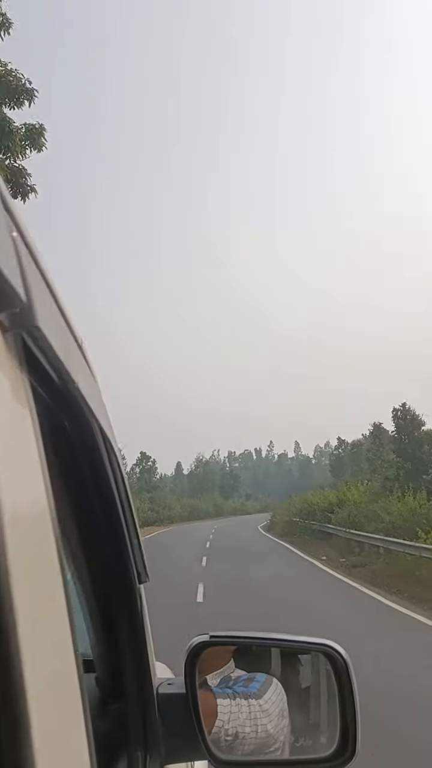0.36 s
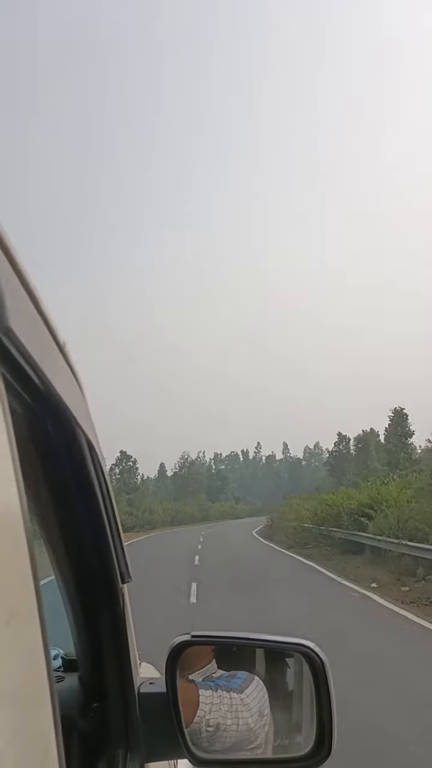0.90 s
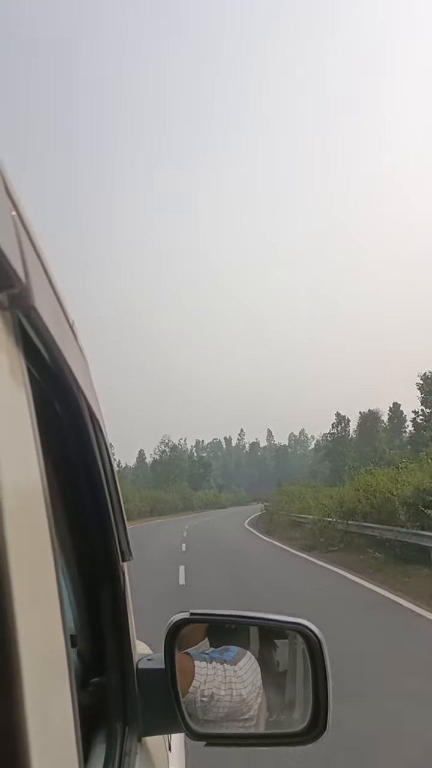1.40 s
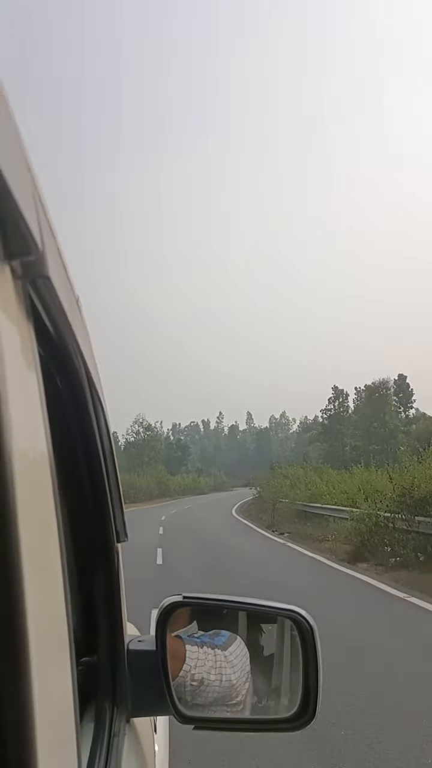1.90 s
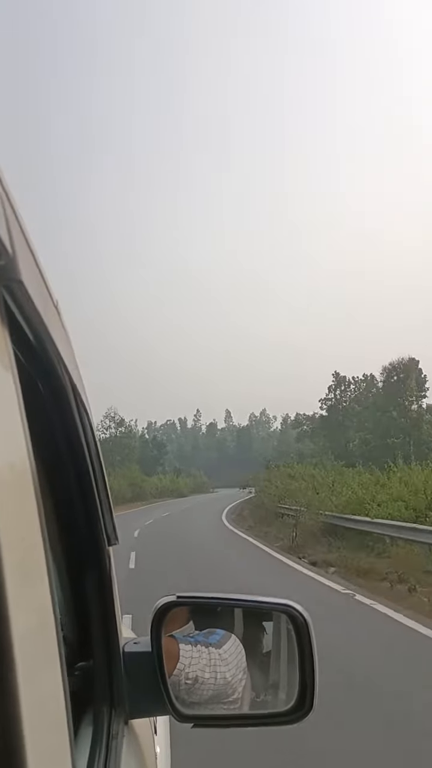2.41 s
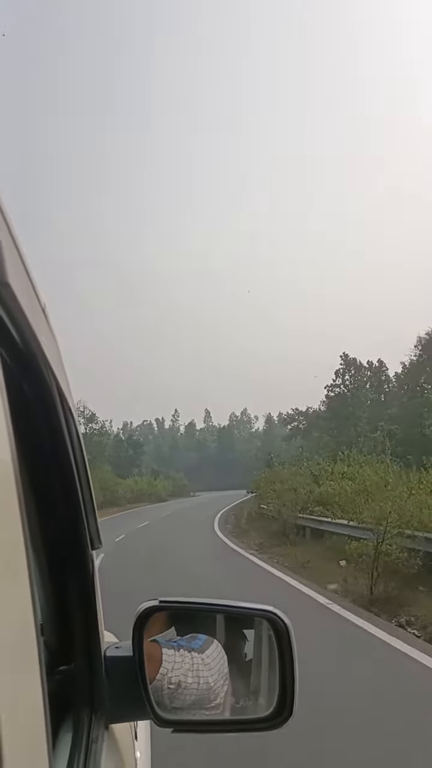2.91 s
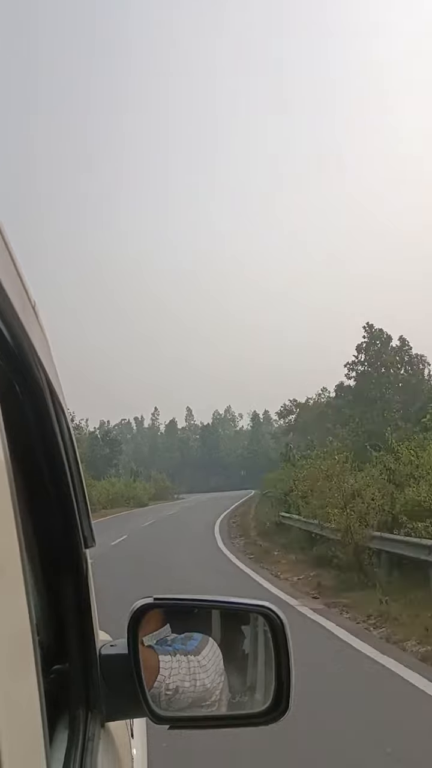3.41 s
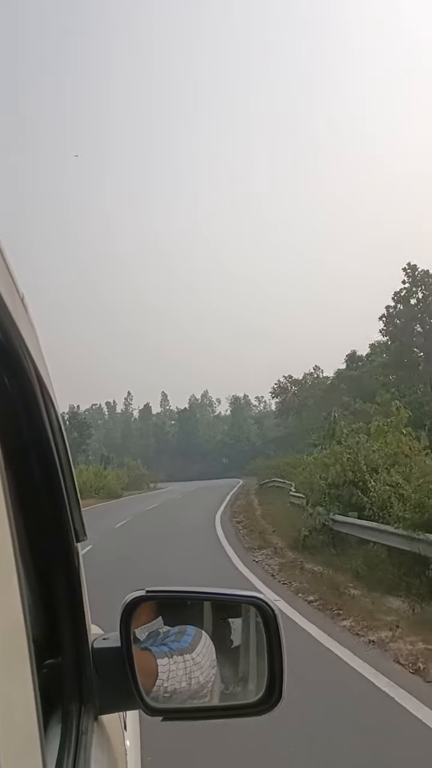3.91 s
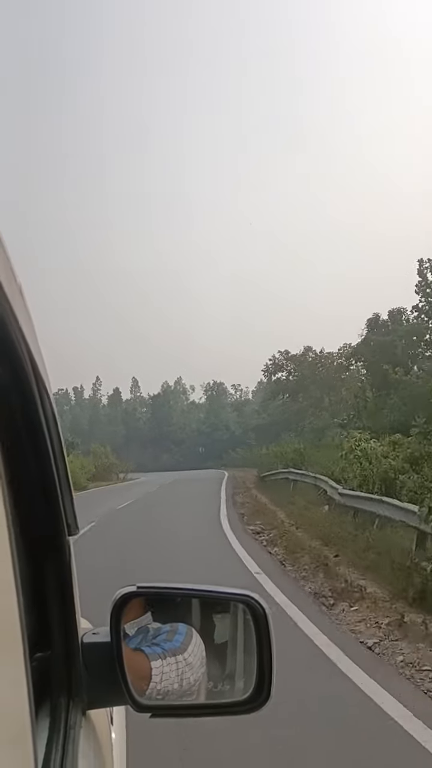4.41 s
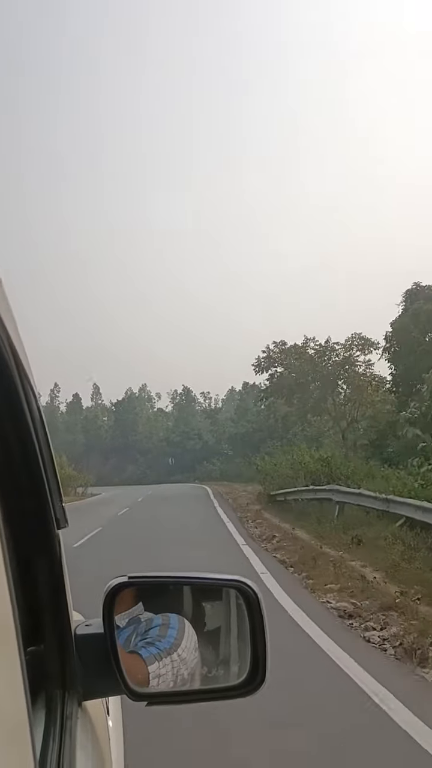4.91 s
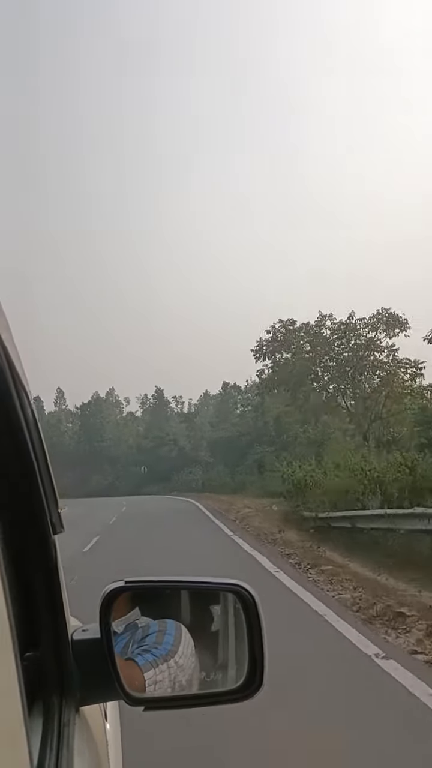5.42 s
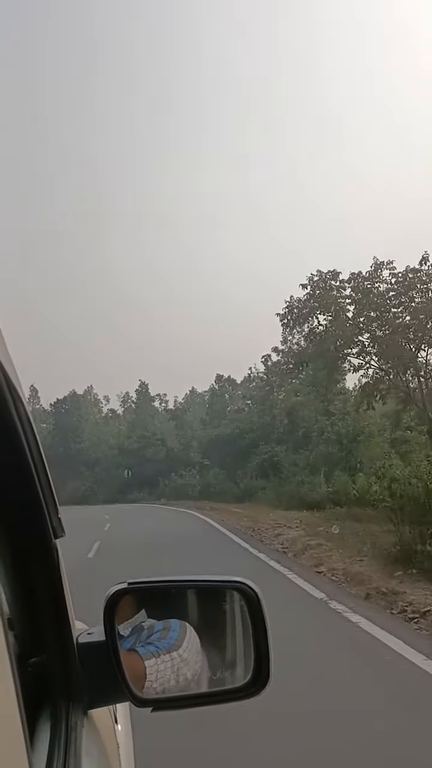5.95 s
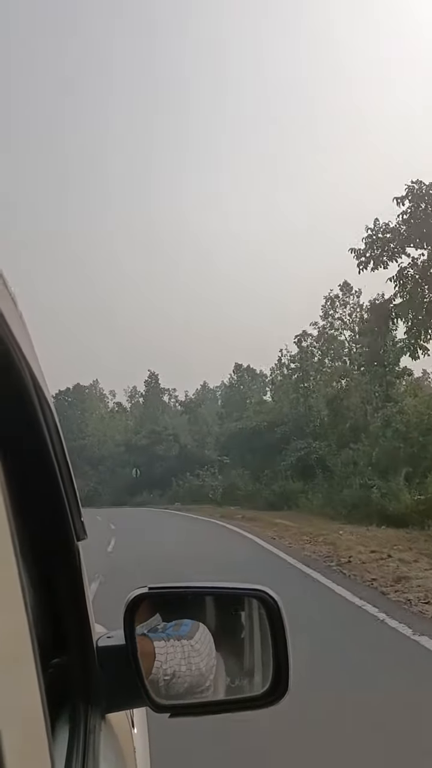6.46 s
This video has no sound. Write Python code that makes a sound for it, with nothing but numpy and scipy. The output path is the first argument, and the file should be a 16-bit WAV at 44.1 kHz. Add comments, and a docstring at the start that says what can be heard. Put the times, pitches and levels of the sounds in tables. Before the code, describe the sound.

Strong wind buffets a microphone at a moving car's open window, rumbling and fluttering with sharp crackles over a steady rush of tyres and air.

```python
"""Wind buffets a handheld recorder held out of the window of a moving car, separately at its two ports.
Big eddies rumble as slow noise; faster flow lifts the corner of a falling noise spectrum, so flutter brightens.
Crackles are short puffs of noise, loud ones listed and small ones around every gust; a few flaps swing at both ports.
Underneath lie smooth noise of tyres and slipstream, with the recorder's own steadier hiss above 7 kHz,
and thin sliding hisses at the left port. A fast limiter rounds the peaks."""
import sys
import numpy as np
from scipy import signal
from scipy.fft import rfft, irfft
from scipy.io import wavfile
from scipy.ndimage import uniform_filter1d, minimum_filter1d

SR = 44100
rng = np.random.default_rng(int(sys.argv[2]) if len(sys.argv) > 2 else 0)


def pcm_store(signal):
    """Save signal as 16-bit PCM."""
    levels = np.round(np.clip(np.atleast_2d(signal), -1, 1) * 32767)
    wavfile.write(sys.argv[1], SR, levels.astype(np.int16).T)


def gain_from_db(level_db):
    """Turn a decibel level (scalar or array-like) into a linear amplitude factor."""
    decades = np.asarray(level_db, float) / 20
    return 10 ** decades


N = 289737

# colour each port gives the wind: (frequency [Hz], gain [dB])
PORT_LEFT = [(2000, -3.5), (6000, -2.5), (7500, -25), (10000, -18), (15000, -10)]
PORT_RIGHT = [(2000, 1), (6500, -8), (8200, -9), (11000, -12.5), (13000, -19), (15500, -27)]
PORTS = PORT_LEFT, PORT_RIGHT
# gusts sweeping past one port: (time [s], port [0 left, 1 right], added flow speed [octaves], length [ms])
GUSTS = [(0.102, 1, 0.6, 19), (0.167, 1, 0.91, 130), (0.22, 0, 1, 33), (0.259, 1, 1.34, 41),
         (0.367, 0, 1.27, 13), (0.4, 1, 1.6, 14), (0.483, 1, 1.36, 90), (0.499, 0, 1.3, 85),
         (0.572, 0, 0.31, 32), (0.599, 1, 0.86, 250), (0.706, 0, 1.44, 70), (0.831, 1, 1.2, 10),
         (0.926, 0, 0.51, 58), (1.002, 1, 0.74, 110), (1.07, 0, 1.2, 26), (1.047, 1, 0.67, 18),
         (1.098, 1, 0.28, 250), (1.211, 0, 1.46, 38), (1.27, 1, 1.3, 50), (1.295, 0, 1.2, 17),
         (1.405, 1, 1, 61), (1.462, 0, 1.44, 37), (1.492, 1, 1.1, 28), (1.55, 1, 1.85, 16),
         (1.624, 1, 0.96, 38), (1.694, 0, 0.3, 51), (1.7, 1, 1.54, 68), (1.743, 0, 1.1, 22),
         (1.782, 1, 1.43, 35), (1.838, 0, 1.2, 15), (1.848, 1, 1.23, 45), (1.885, 0, 0.67, 39),
         (1.909, 1, 1.02, 26), (2.029, 0, 0.9, 19), (2.104, 1, 0.85, 96), (2.155, 1, 1.05, 25),
         (2.177, 0, 1.1, 80), (2.231, 1, 0.9, 30), (2.361, 1, 1.45, 31), (2.473, 1, 0.91, 63),
         (2.525, 0, 0.88, 59), (2.6, 1, 1.66, 24), (2.667, 0, 1.4, 19), (2.68, 1, 1.33, 63),
         (2.712, 0, 1.8, 23), (2.815, 1, 1.35, 35), (2.87, 0, 0.94, 32), (2.919, 1, 1.97, 25),
         (2.98, 1, 1.25, 30), (3.052, 0, 1.1, 36), (3.13, 0, 1.14, 18), (3.293, 1, 1.27, 72),
         (3.372, 0, 0.48, 47), (3.503, 1, 1.6, 29), (3.618, 1, 1.06, 41), (3.636, 0, 1.6, 22),
         (3.68, 1, 0.95, 16), (3.717, 0, 1.3, 21), (3.738, 1, 1, 140), (3.776, 0, 0.83, 52),
         (3.823, 0, 0.93, 11), (3.94, 1, 0.86, 27), (3.972, 0, 1.5, 28), (4.013, 1, 1.9, 22),
         (4.063, 0, 1.35, 62), (4.151, 0, 0.7, 23), (4.169, 1, 1.74, 18), (4.193, 0, 0.66, 21),
         (4.199, 1, 0.69, 29), (4.329, 1, 1.35, 26), (4.383, 1, 1.46, 61), (4.36, 0, 0.8, 37),
         (4.4, 0, 0.68, 24), (4.469, 1, 1.5, 19), (4.523, 1, 1.14, 32), (4.627, 0, 1.7, 32),
         (4.652, 0, 1.5, 33), (4.648, 1, 1.1, 25), (4.68, 1, 0.94, 43), (4.69, 0, 1.3, 26),
         (4.729, 1, 1.4, 14), (4.778, 0, 1.13, 44), (4.794, 1, 0.83, 23), (4.887, 1, 1.7, 91),
         (4.931, 0, 0.7, 63), (4.967, 1, 0.87, 23), (5.039, 0, 1.3, 60), (5.114, 1, 0.96, 47),
         (5.132, 0, 1.6, 21), (5.141, 1, 1.02, 17), (5.21, 0, 1.3, 54), (5.218, 1, 1.16, 80),
         (5.299, 1, 0.97, 23), (5.316, 0, 0.68, 21), (5.361, 1, 0.92, 24), (5.442, 0, 1.04, 24),
         (5.455, 1, 1.4, 45), (5.535, 0, 0.6, 37), (5.556, 1, 0.95, 21), (5.684, 0, 1.04, 20),
         (5.722, 1, 0.77, 190), (5.772, 1, 0.5, 52), (5.786, 0, 1.07, 56), (5.841, 1, 1.04, 67),
         (5.931, 0, 0.94, 16), (5.999, 1, 1.15, 35), (6.032, 0, 1, 30), (6.151, 1, 0.84, 59),
         (6.334, 1, 0.79, 39), (6.394, 0, 0.43, 44), (6.415, 1, 1.26, 50), (6.473, 1, 0.81, 130)]
GUST_RISE_SHARE = 0.5  # part of a gust's length spent rising


def evened(x):
    """Scales a signal to rms 1."""
    return x / np.sqrt(np.mean(x ** 2) + 1e-20)


def read(points, hz):
    """Reads a (frequency, value) curve along a logarithmic frequency axis."""
    f, value = np.transpose(points)
    return np.interp(np.log(hz + 1), np.log(f + 1), value)


def wander(frames, smooth):
    """Slow chance of rms 1: noise smoothed by a bell about `smooth` frames wide."""
    steps = np.arange(-40, 41)
    bell = np.exp(-.5 * (steps / smooth) ** 2)
    return evened(np.convolve(rng.standard_normal(frames), bell, "same"))


def coloured(x, gain):
    """Fixed filter: gain(hz) as a factor."""
    return irfft(rfft(x) * gain(np.fft.rfftfreq(N, 1 / SR)), N)


def shaped(noise, gain_db, size):
    """Moving filter: weights the short-time spectrum of the noise by gain_db(hz, t)."""
    overlap = size * 3 // 4
    hz, t, z = signal.stft(noise, SR, nperseg=size, noverlap=overlap)
    z = z * gain_from_db(gain_db(hz[:, None], t))
    return signal.istft(z, SR, nperseg=size, noverlap=overlap)[1][:N]


def bumps(events, port, t, rise=0.46):
    """The tallest bell at each moment; an event's length is the width at half height."""
    here = [row for row in events if round(row[1]) == port]
    s, _, height, ms = np.transpose(here)[:, :, None]
    half_s = ms / 1000 * np.where(t < s, rise, 1 - rise)
    return (height * 2. ** -((t - s) / half_s) ** 2).max(axis=0)


def rush():
    """Tyres and slipstream, with the recorder's own steadier hiss above 7 kHz: patchy noise, partly shared."""
    # rush and hiss at each port: (frequency [Hz], level [dB])
    left_colour = [(600, 0), (1000, 3), (1600, -3.5), (2100, -2.5), (2600, -3.5), (3000, -7.5), (3500, -8),
                   (4800, -18.5), (6000, -13.5), (6800, -21), (7500, -39.5), (10500, -32.5), (12200, -36.5),
                   (14000, -31.5), (15500, -29)]
    right_colour = [(600, 0), (1000, 1), (1600, -11.5), (2400, -8), (3400, -15.5), (4800, -24),
                    (6800, -31.5), (8300, -28.5), (10500, -31.5), (13000, -38.5), (14200, -62),
                    (15500, -69)]
    # the rush swells with the roadside: (time [s], left [dB], right [dB])
    swell_points = [(0.0, -5, -4), (0.51, 1.5, -1), (0.77, 0, -2.5), (1.1, 4.5, 1.5), (1.57, 4, -4.5),
                    (2.05, 5, 0), (2.22, 2.5, -2), (2.5, 5, 4), (2.92, 5, 3), (3.21, 6, 6.5),
                    (3.61, 6.5, 4), (3.65, 0, -4), (3.95, 4, -0.5), (4.33, 2, 0.5), (4.57, 4, 0.5),
                    (5.22, -1.5, -3), (5.78, 1.3, -1.5), (6.57, 4, -1)]
    # part of the noise that both ports share: (frequency [Hz], likeness [0-1])
    shared_points = [(2000, 0.72), (6000, 0.03), (7500, 0.05)]
    level_db, patchy_db = -21, 0.9
    left_lead_s = 20 / SR  # the shared part reaches the left port first
    swell = np.transpose(swell_points)

    def likeness(hz):
        return np.clip(read(shared_points, hz), 0, 1)

    left, own = rng.standard_normal((2, N))
    late = coloured(left, lambda hz: likeness(hz) * np.exp(-2j * np.pi * hz * left_lead_s))
    right = late + coloured(own, lambda hz: np.sqrt(1 - likeness(hz) ** 2))

    def gain_db(hz, t, port):
        patches = uniform_filter1d(rng.standard_normal((len(hz), len(t))), size=12, axis=0)
        patches = evened(uniform_filter1d(patches, size=20, axis=1))
        follows = np.where(hz < 7200, 1, .55)  # the recorder's hiss is steadier
        moving = follows * np.interp(t, swell[0], swell[port + 1])
        moving = moving + 0.61 * wander(len(t), 3.5)
        moving = moving + (hz > 7200) * 1.0 * wander(len(t), 22)  # random level wander above 7.2 kHz, dB rms
        return level_db + read((left_colour, right_colour)[port], hz) + moving + patchy_db * patches

    return np.array([shaped(x, lambda hz, t: gain_db(hz, t, port), size=512)
                     for port, x in enumerate((left, right))])


def hisses():
    """Thin high hisses at the left port: narrow bands of noise that swell, slide or hold pitch, and fade."""
    # (start [s], length [s], from [Hz], to [Hz], level [dB])
    hiss_rows = [(0.672, 0.014, 14500, 14500, -44), (0.78, 0.29, 14300, 15650, -56),
                 (1.1, 0.14, 14600, 15500, -62)]
    least_width_hz = 700
    out = np.zeros((2, N))
    for s, length, from_hz, to_hz, db in hiss_rows:
        u = np.arange(round(length * SR)) / (length * SR)
        a, b = rng.standard_normal((2, len(u)))
        width_hz = least_width_hz * (1 + .03 / length)  # short ones spread wider
        r = np.exp(-np.pi * width_hz / SR)
        band = signal.lfilter([1], [1, -r], a + 1j * b)
        band = signal.lfilter([1], [1, -r], band)
        pitch_hz = from_hz + (to_hz - from_hz) * u
        band = (band * np.exp(2j * np.pi * np.cumsum(pitch_hz) / SR)).real
        out[0, round(s * SR):][:len(u)] += gain_from_db(db) * evened(band) * np.sqrt(np.sin(np.pi * u))
    return out


def flow(port, t):
    """Air at one port: rumble level in dB, flow speed in octaves, and the quick swells in dB."""
    # how hard the air blows on each port: (time [s], left rumble [dB], right rumble [dB])
    blow_points = [(0.0, -16.5, -22), (0.51, -16, -12.5), (1.01, -16, -13.5), (1.52, -15, -11),
                   (2.02, -18.5, -10.5), (2.53, -15, -16.5), (3.03, -17, -14), (3.54, -16, -14.5),
                   (4.04, -16.5, -13.5), (4.55, -14, -12.5), (5.05, -16, -16.5), (5.56, -17, -16.5),
                   (6.06, -15, -11.5), (6.57, -18, -17)]
    # lulls in the buffeting: (time [s], port [0 left, 1 right], rumble dip [dB], length [ms])
    lull_rows = [(0.045, 0, 10, 45), (0.167, 0, 12, 22), (0.202, 1, 9, 19), (0.282, 0, 10, 22),
                 (0.344, 1, 8, 56), (0.402, 0, 15, 33), (0.519, 1, 14, 67), (0.626, 0, 0, 92),
                 (0.771, 1, 7.5, 64), (0.778, 0, 7, 53), (0.868, 1, 11, 18), (0.878, 0, 19, 27),
                 (0.923, 1, 18, 14), (0.975, 0, 5, 40), (1.023, 0, 15, 14), (1.102, 0, 7, 24),
                 (1.227, 1, 8.5, 38), (1.275, 0, 7, 27), (1.571, 0, 6, 22), (2.08, 0, 4, 30),
                 (2.185, 1, 14.5, 19), (2.275, 0, 6, 41), (2.312, 1, 8, 65), (2.412, 1, 7, 33),
                 (3.066, 1, 5, 47), (3.15, 1, 9, 23), (3.345, 0, 6, 21), (3.437, 1, 14, 20),
                 (3.707, 1, 7, 33), (3.871, 0, 8, 41), (4.023, 0, 7, 40), (4.108, 1, 8.4, 28),
                 (4.245, 1, 11, 62), (4.482, 0, 3, 32), (4.545, 0, 8, 24), (4.81, 1, 5, 15),
                 (4.834, 0, 13, 89), (4.954, 0, 20, 22), (5.32, 1, 6, 25), (5.498, 0, 10, 14),
                 (5.575, 0, 13, 43), (5.877, 0, 1, 26), (5.919, 1, 7, 57), (6.001, 0, 12, 19),
                 (6.056, 1, 11, 37), (6.081, 0, 12, 13), (6.178, 0, 5, 25), (6.241, 1, 9, 25),
                 (6.37, 1, 6, 21)]
    # rounded thumps of a big eddy: (time [s], port [0 left, 1 right], lift [dB], length [ms])
    thump_rows = [(0.085, 1, 12, 35), (0.137, 1, 2.5, 33), (0.262, 1, 5.5, 48), (0.444, 0, 6, 35),
                  (0.895, 1, 4, 28), (1.063, 0, 2, 45), (1.312, 0, 5.5, 40), (1.841, 0, 9, 56),
                  (2.155, 0, 3, 34), (2.227, 1, -1.5, 45), (2.906, 1, 4.7, 27), (3.325, 1, 7, 32),
                  (3.417, 0, 9.5, 23), (4.086, 0, 5.5, 30), (4.298, 0, 4.5, 58), (4.502, 1, 7, 49),
                  (5.128, 0, -2, 12), (5.443, 0, 8, 30), (5.64, 1, 4.5, 17), (5.749, 0, 11.5, 63),
                  (5.802, 1, 5, 15), (6.034, 0, 4, 35)]
    calm_octaves = (1, 0.89)  # flow speed between gusts, left and right
    gust_lift_db, lull_slowing = 2.5, 0.014  # rumble dB per octave of gust; octaves lost per dB of lull
    blow = np.transpose(blow_points)
    gust = bumps(GUSTS, port, t, GUST_RISE_SHARE)
    lull = bumps(lull_rows, port, t)
    swell_db = bumps(thump_rows, port, t) - lull
    level_db = np.interp(t, blow[0], blow[port + 1]) + gust_lift_db * gust + swell_db
    speed = calm_octaves[port] + gust - lull_slowing * lull
    return level_db, speed, swell_db


def throb():
    """Slow random gain, 2.36 dB rms, shared by the rumble and flutter of one port."""
    frames = N // 256 + 2
    return gain_from_db(2.36 * np.interp(np.arange(N) / 256, np.arange(frames), wander(frames, 4.9)))


def rumble(port):
    """Big eddies: slow pressure lumps of fairly even height under the rumble level."""
    # spectrum of the big eddies: (frequency [Hz], gain [dB])
    spectrum = [(15, -1), (30, 5), (60, 6), (100, 1), (150, -3.5), (250, -12), (500, -52), (2500, -130)]
    steadiness = 0.39  # 0 leaves the lumps uneven, 1 evens them fully
    lumps = coloured(rng.standard_normal(N), lambda hz: gain_from_db(read(spectrum, hz)))
    power = uniform_filter1d(uniform_filter1d(lumps ** 2, size=1500), size=1500)
    height = np.sqrt(abs(power) + 1e-12)
    t = np.arange(0, N / SR, .004)
    level_db = np.interp(np.arange(N) / SR, t, flow(port, t)[0])
    return evened(lumps / height ** steadiness) * gain_from_db(level_db)


def flutter(port):
    """Frozen turbulence: the corner of its spectrum rises with the flow speed, which jitters and surges."""
    # left row, right row: (level [dB], fall above the corner [dB per octave], speed jitter [octaves], lowest [Hz])
    port_rows = [(5.5, 13.84, 0.3, 101), (6, 13.43, 0.32, 42)]
    slow_corner_hz = 96.7  # finest eddies at speed 0
    gust_flicker = 0.3  # octaves of flicker per octave of gust
    follows = 0.66  # share of each lull and thump that the smaller eddies feel
    level_db, fall_db, jitter, low_hz = port_rows[port]

    def gain_db(hz, t):
        rumble_db, speed, swell_db = flow(port, t)
        speed = speed + jitter * wander(len(t), 2.7)
        gust = bumps(GUSTS, port, t)
        speed += gust_flicker * gust * wander(len(t), 1.57)  # gusts arrive as ragged bursts
        speed += 0.073 * np.maximum(wander(len(t), 0.46), 0) ** 2  # sharp eddy edges flick by
        over_corner = hz / slow_corner_hz / 2 ** speed
        fall = fall_db / 2 * np.log2(1 + over_corner ** 2)
        fall += 5 * np.log2(1 + (over_corner / 9) ** 2)  # viscosity wipes out the finest eddies
        # part of each rumble swell also lifts the smaller eddies
        lift = 0.33 * (rumble_db + 13) + follows * swell_db / (1 + (hz / 600) ** 2)
        return level_db + lift - fall + read(PORTS[port], hz) + 1.85 * wander(len(t), 1.35)

    eddies = shaped(rng.standard_normal(N), gain_db, size=256)
    return coloured(eddies, lambda hz: 1 / (1 + (low_hz / (hz + 1)) ** 2))  # the largest belong to the rumble


def flaps():
    """Heavy flaps that strike both ports together: a few swings under a bell-shaped envelope."""
    # (time [s], frequency [Hz], peak [dB], length at half height [ms])
    flap_rows = [(4.648, 270, -2.5, 24), (6.018, 110, -7, 20)]
    t = np.arange(N) / SR
    out = np.zeros(N)
    for s, hz, db, ms in flap_rows:
        bell = 2. ** -((t - s) / ms * 2000) ** 2
        out += gain_from_db(db) * bell * np.cos(2 * np.pi * (hz * (t - s) + rng.random()))
    return out


def scattered(count):
    """Rows of small crackles, `count` at random around each gust's peak, louder in faster gusts."""
    small_db, db_per_octave, spread_db = -62, 14, 6
    treble_db, treble_spread_db = -29.5, 5
    rows = []
    for (s, port, up, ms), draws in zip(GUSTS, rng.uniform(-1, 1, (len(GUSTS), count, 3))):
        for a, b, c in draws:
            level_db = small_db + db_per_octave * up + spread_db * b
            rows.append((s + 0.36 * ms / 1000 * a, port, level_db, treble_db + treble_spread_db * c))
    return rows


def crackles():
    """Crackles: short puffs of noise tilted in the treble, loud ones listed and small ones around every gust."""
    # loud crackles: (time [s], port [0 left, 1 right], level [dB], treble against middle [dB])
    loud_rows = [(0.04, 1, -34.5, -21), (0.1415, 1, -38, -38), (0.238, 1, -30, -34), (0.2609, 1, -20, -18),
                 (0.399, 1, -16, -19), (0.445, 0, -27, -32), (0.4563, 1, -18, -12), (0.4644, 1, -23, -22),
                 (0.5714, 0, -26, -19), (0.597, 1, -25, -25), (0.6042, 1, -20, -26), (0.705, 0, -29, -28),
                 (0.7107, 0, -25, -28), (0.98, 1, -25, -29), (1.0028, 1, -27.5, -27.5),
                 (1.0956, 0, -30, -22), (1.2098, 0, -27, -30), (1.269, 1, -17, -15),
                 (1.2761, 1, -23.5, -27), (1.4029, 1, -21, -16), (1.408, 1, -16.5, -14),
                 (1.495, 1, -32, -29), (1.535, 1, -32, -32), (1.673, 1, -21.5, -25), (1.784, 1, -23.5, -23),
                 (2.0523, 1, -25, -33), (2.062, 1, -24, -28), (2.0754, 1, -14, -22), (2.0847, 1, -16, -23),
                 (2.1369, 0, -19, -19), (2.1793, 0, -24, -34), (2.464, 1, -29.5, -30),
                 (2.4733, 1, -16, -21), (2.6, 1, -28, -36), (2.655, 1, -44, -38), (2.716, 0, -38, -30),
                 (2.8, 1, -44, -31), (2.8155, 1, -26, -31), (2.914, 1, -31, -39), (2.929, 1, -34, -41),
                 (2.977, 1, -34, -37), (3.288, 1, -39, -34), (3.503, 1, -24, -40), (3.518, 1, -31.5, -34),
                 (3.613, 1, -15, -26), (3.6244, 1, -25.5, -22.1), (3.738, 1, -33, -34),
                 (3.7757, 1, -20, -18.5), (3.785, 1, -29, -33), (3.8037, 1, -29, -28.5),
                 (4.013, 1, -36, -34), (4.0212, 1, -27, -29), (4.032, 1, -32, -31), (4.2, 1, -45, -44),
                 (4.3281, 1, -34.5, -26), (4.3813, 1, -18, -20), (4.3872, 1, -16, -18),
                 (4.395, 1, -26, -30), (4.4773, 1, -32, -28), (4.674, 1, -37, -33), (4.8517, 1, -28.5, -34),
                 (4.9323, 0, -24.5, -24), (4.959, 1, -36.5, -43), (5.072, 1, -27, -20),
                 (5.0791, 1, -19, -17), (5.0871, 0, -23, -29), (5.0896, 1, -17, -22),
                 (5.1388, 0, -38, -18.9), (5.215, 1, -26, -26), (5.2274, 1, -26, -32), (5.235, 1, -28, -22),
                 (5.25, 1, -32, -35), (5.2669, 1, -30, -29), (5.273, 1, -29.5, -32), (5.301, 1, -43, -29),
                 (5.362, 1, -32, -25), (5.455, 1, -34, -43), (5.645, 1, -28, -32), (5.777, 1, -32, -20),
                 (5.842, 1, -46, -34), (5.857, 1, -43, -30), (6.41, 1, -42, -25)]
    ms = 3.04  # time scale of a puff
    body_hz = 1700  # the tilt makes a crackle no stronger below this
    out, hz = np.zeros((2, N + 2048)), np.fft.rfftfreq(2048, 1 / SR)
    rows = list(loud_rows) + scattered(count=3)
    t = (np.arange(2048) - 1024) / SR
    rise = np.exp(-(t / ms * 2600) ** 2)
    fade = 0.56 * np.exp(-(t / ms * 1700) ** 2) + 0.19 * np.exp(-abs(t) / ms * 400)
    puff = np.where(t < 0, rise, fade)  # quick rise, slower end, long tail
    counted = (hz > 3000) & (hz < 12000)  # the level counts this band
    noise = rng.standard_normal((len(rows), 2048))
    for (s, port, db, treble_db), hiss in zip(rows, noise):
        port = round(port)
        tilt_db = treble_db * np.log2(np.maximum(hz, body_hz) / 2500) / 2.0
        colour = gain_from_db(read(PORTS[port], hz) + tilt_db) * hz / (hz + 400)
        hiss = irfft(rfft(hiss) * colour) / np.sqrt(np.mean(colour ** 2 * counted))
        out[port, round(s * SR):][:2048] += gain_from_db(db) * hiss * puff
    return out[:, 1024:N + 1024]


def scene():
    """Wind at each port over the rush and hisses, with flaps and crackles on top."""
    wind = np.array([(rumble(port) + flutter(port)) * throb() for port in range(2)])
    # the wind arrives hotter than the limiter lets through
    return gain_from_db(4.0) * wind + flaps() + crackles() + rush() + hisses()


def roll_off(x):
    """The treble ends steeply here."""
    return signal.sosfilt(signal.butter(12, 16930, fs=SR, output="sos"), x)


def record(dry):
    """A look-ahead limiter on each channel eases the gain down for a few ms around peaks; a low-pass follows."""
    ceiling, edge_hz = 0.9, 15800
    allowed = np.minimum(1, ceiling / (abs(dry) + 1e-9))
    held = minimum_filter1d(allowed, size=181, axis=1)
    ease = signal.windows.hann(181)
    gain = 1 - signal.oaconvolve(1 - held, ease[None] / ease.sum(), "same")
    edge = signal.firwin(511, edge_hz, window=("kaiser", 9), fs=SR)
    mix = signal.oaconvolve(dry * gain, edge[None], "same")
    return roll_off(mix)


dry = scene()
out = record(dry)
pcm_store(out)
```